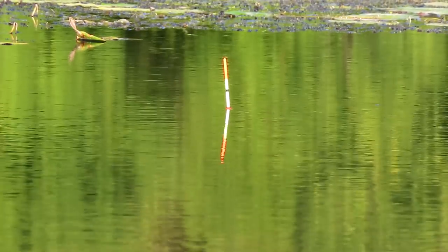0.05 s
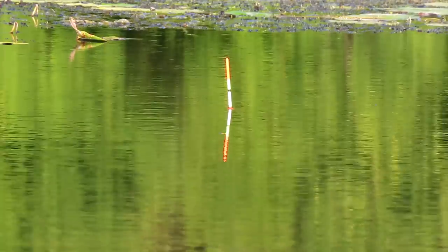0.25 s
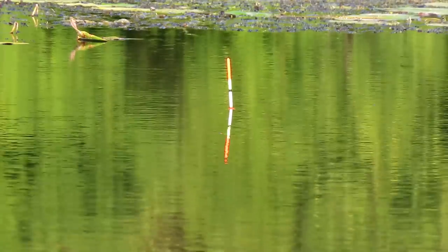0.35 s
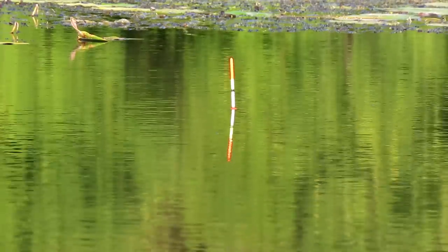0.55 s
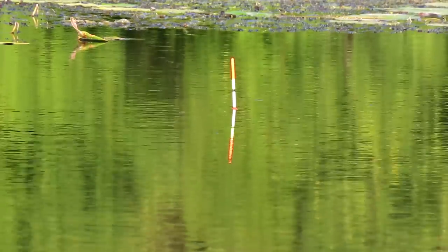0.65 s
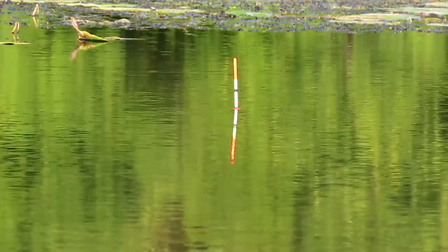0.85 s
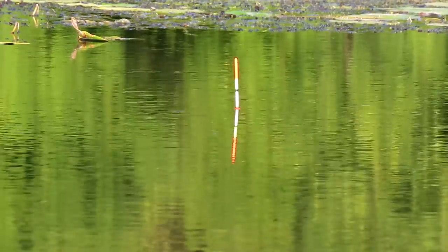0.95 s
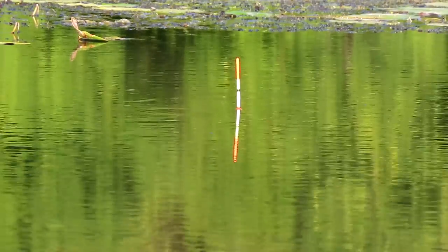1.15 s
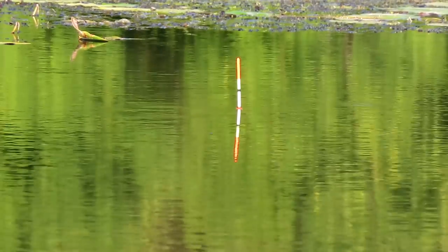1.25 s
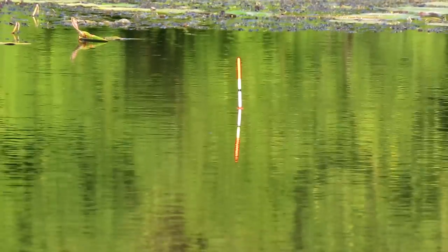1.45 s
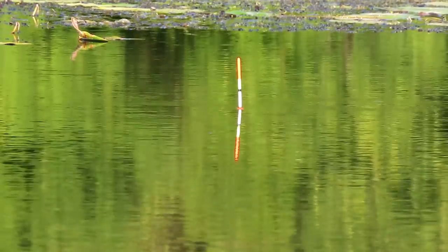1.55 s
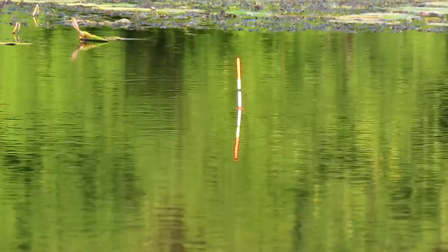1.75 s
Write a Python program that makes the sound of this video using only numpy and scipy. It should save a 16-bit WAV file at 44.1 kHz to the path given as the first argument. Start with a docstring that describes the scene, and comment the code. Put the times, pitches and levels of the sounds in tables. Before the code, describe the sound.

A frog calls beside a calm pond. From about 0.2 to 0.4 seconds it gives a wavering squeal that breaks into a rasp. From 0.7 to 1 second it croaks seven quick, rough-edged notes that grow louder. After a pause, four soft clucks come between 1.6 and 1.8 seconds. The calls have a slight, short echo, and a steady distant rumble with faint hiss continues throughout.

```python
"""Beside a calm pond, a frog gives one wavering squeal that breaks into a rasp, then a croak of seven
quick notes and a few soft clucks. Its vocal folds snap shut again and again, and each pulse makes its
throat ring; as a note's pulses slow down they turn uneven. The bank gives a short echo and the trees
a faint longer one, over a steady distant rumble."""
import sys
import numpy as np
from scipy import signal
from scipy.fft import rfft, irfft, next_fast_len
from scipy.io import wavfile

SR = 44100
rng = np.random.default_rng(int(sys.argv[2]) if len(sys.argv) > 2 else 0)


def unload_audio(sound):
    """Save the sound as a 16-bit wav file, at the path given as the first command line argument."""
    columns = np.transpose(np.atleast_2d(sound))
    # keep every value between -1 and 1, then stretch to whole-number steps
    steps = np.round(np.clip(columns, -1, 1) * 32767)
    wavfile.write(sys.argv[1], SR, steps.astype(np.int16))


N = 79380


def squeal():
    """A wavering tone whose dips in pitch grow deeper until it breaks into a rasp."""
    # Each row: time in seconds, pitch in Hz.
    pitch_curve = [(.17, 450), (.197, 485), (.205, 547), (.22, 523), (.232, 540), (.239, 531), (.247, 543),
                   (.258, 501), (.272, 526), (.284, 468), (.298, 562), (.308, 470), (.317, 385),
                   (.325, 505), (.332, 545), (.341, 475), (.351, 375), (.36, 490), (.367, 552), (.382, 435),
                   (.392, 340), (.43, 320)]
    # Each row: time in seconds, throat ring in Hz at the easy pitch, half width in Hz, roughness 0-1.
    throat_curve = [(.169, 1570, 605, 0.13), (.195, 1760, 680, 0.26), (.207, 2050, 524, 0.03),
                    (.25, 2040, 516, 0.05), (.275, 1990, 475, 0.1), (.288, 1960, 540, 0.01),
                    (.302, 1564, 382, 0.04), (.317, 1665, 420, 0.29), (.332, 1525, 357, 0.09),
                    (.351, 1730, 423, 0.34), (.368, 1555, 390, 0), (.39, 1820, 474, 0.42),
                    (.425, 2100, 564, 0.63)]
    # Each row: time in seconds, throat level in dB.
    level_curve = [(.17, -40), (.178, -38), (.2, -36.5), (.225, -29.5), (.234, -30), (.248, -20),
                   (.257, -28.5), (.268, -21.5), (.29, -21), (.306, -19), (.319, -24.5), (.326, -23.5),
                   (.34, -18), (.354, -25.5), (.367, -19.5), (.382, -23), (.39, -33.5), (.402, -23),
                   (.415, -28.5), (.43, -44)]
    # Each row: time in seconds, body level in dB, treble level in dB.
    colour_curve = [(.169, -62.5, -67), (.205, -55, -44), (.258, -43.5, -35), (.275, -30, -33.5),
                    (.29, -44, -33), (.302, -29, -43), (.33, -36.5, -29.5), (.348, -29.5, -36),
                    (.37, -29.5, -29.5), (.386, -38, -43), (.404, -32, -34), (.425, -49, -74)]
    easy_pitch_hz = 510
    t = np.arange(pitch_curve[0][0], pitch_curve[-1][0], 1 / SR)
    times = pulse_times(t, *at(pitch_curve, t))
    pitch_hz, = at(pitch_curve, times)
    throat_hz, width_hz, rough = at(throat_curve, times)
    throat_hz = throat_hz * np.sqrt(pitch_hz / easy_pitch_hz)  # the ring rises with the pitch
    throat_db, = at(level_curve, times)
    body_db, treble_db = at(colour_curve, times)
    return voice(times, pitch_hz, rough, throat_hz, width_hz, throat_db, body_db, treble_db)


def croak():
    """Seven quick pushes of air, one note each."""
    # Each row: start, peak and end in seconds, throat level in dB, pitch at the peak in Hz, throat ring
    # in Hz, body and treble levels in dB, rise and fall in dB, roughness 0-1.
    notes = [(0.704, 0.707, .725, -35, 240.4, 1350, -29.5, -55, 3.5, 2, 0.01),
             (0.741, 0.752, .772, -27, 408.4, 1310, -25.5, -48, 10.5, 8.5, 0.12),
             (.794, 0.801, .819, -21.5, 416, 1410, -27, -41.5, 9, 3, 0),
             (0.836, 0.846, .868, -17, 456.7, 1710, -30, -29.5, 13, 5, .04),
             (0.88, 0.891, .915, -13.5, 476.3, 1763, -29, -24, 13.5, 12, .03),
             (0.922, 0.936, .96, -14, 472.5, 1690, -23, -23.5, 21, 16.5, 0.09),
             (0.971, .981, 1.0, -15, 470, 1715, -27.5, -26.5, 10.5, 14.5, 0.05)]
    return sum(note(*row) for row in notes)


def note(start, peak, end, db, pitch_hz, throat_hz, body_db, treble_db, rise_db, fall_db, rough):
    """One push of air: it starts a little flat and rough, swells, then slows, weakens and turns uneven."""
    sag_hz_per_s, throat_width_hz, body_lag_s, close_s = 1830, 514, .005, .0054

    def early(t):  # 1 at the start, 0 from the peak on
        return np.clip((peak - t) / (peak - start), 0, 1)

    def late(t):  # 0 up to the peak, 1 at the end
        return np.clip((t - peak) / (end - peak), 0, 1)

    def pitch(t):
        sagging_hz = pitch_hz - sag_hz_per_s * (t - peak)
        return sagging_hz * (1 - .31 * late(t) ** 2 - .1 * early(t) ** 2)

    def swell_db(t):
        rising = rise_db * np.sin(np.pi / 2 * early(t)) ** 1.2
        falling = fall_db * np.sin(np.pi / 2 * late(t)) ** .89
        return -rising - falling

    t = np.arange(start, end, 1 / SR)
    times = pulse_times(t, pitch(t))
    rough = rough + .6 * late(times) ** 1.65 + .15 * early(times) ** 2
    fade_db = 2 * np.clip(1 - (end - times) / close_s, 0, 1)  # the last pulses fade as the folds close
    throat_db = db + swell_db(times) - fade_db
    body_db = body_db + .91 * swell_db(times - body_lag_s) - fade_db
    treble_db = treble_db + .79 * swell_db(times) - fade_db
    return voice(times, pitch(times), rough, throat_hz, throat_width_hz, throat_db, body_db, treble_db)


def voice(times, pitch_hz, rough, throat_hz, throat_width_hz, throat_db, body_db, treble_db):
    """Pulses ring the throat, body and treble tones; roughness makes the pulses uneven and noisy."""
    # Each row, in both tables: ringing tone in Hz, half width in Hz, relative level in dB.
    body_tones = [(523, 85, -12), (758, 134, -2), (2454, 255, -16.5)]
    treble_tones = [(2725, 170, -10), (3472, 440, -7), (4240, 294, -3), (4740, 270, -20.5),
                    (5360, 580, -30.5), (9200, 2500, -40.5)]
    jitter_cycles, shimmer_db, typical_pulses_per_s = .22, 3.5, 450
    rough = np.clip(rough, 0, 1)
    chance = rng.standard_normal((256, 2))[:len(times)]
    times = times + jitter_cycles * rough * chance[:, 0] / pitch_hz
    scatter_db = shimmer_db * rough * chance[:, 1]
    rasp = .02 + .22 * rough  # the share of rushing-air noise in a pulse
    tones = [(throat_hz, throat_width_hz, throat_db, rasp)]
    tones += [(hz, width, db + body_db, 4.5 * rasp) for hz, width, db in body_tones]
    tones += [(hz, width, db + treble_db, 3 * rasp) for hz, width, db in treble_tones]
    sound = np.zeros(N)
    for hz, width, db, tone_rasp in tones:
        size = amp(db + scatter_db) * np.sqrt(5 * width / typical_pulses_per_s)  # boosts short rings
        sound += ring(times, hz, width, size, tone_rasp)
    return sound


def pulse_times(t, pitch_hz):
    """One pulse each time the vocal folds finish a cycle."""
    cycles = np.cumsum(np.maximum(pitch_hz, 20)) / SR
    return np.interp(np.arange(int(cycles[-1]) + 1), cycles, t)


def ring(times, hz, width_hz, size, rasp):
    """Each pulse rings one tone, partly at random (rasp). A larger half width means a shorter ring."""
    times, hz, width_hz, size, rasp = (np.reshape(v, (-1, 1)) for v in (times, hz, width_hz, size, rasp))
    ring_s = .012
    index = np.ceil(times * SR).astype(int) + np.arange(int(ring_s * SR))
    age = index / SR - times
    progress = .75 * np.pi * width_hz * age
    envelope = (progress * np.exp(1 - progress)) ** 3  # loudest when progress is 1
    flutter = rng.standard_normal((256, 2))[:len(times)]
    phase = 2 * np.pi * hz * age
    noisy = flutter[:, :1] * np.sin(phase) + flutter[:, 1:] * np.cos(phase)
    rings = size * envelope * (np.sin(phase) + rasp * noisy)
    return np.bincount(index.ravel(), rings.ravel(), N)[:N]  # add each ring at its place in time


def clucks():
    """Single soft pulses with the throat slack: one just before the croak, four later on."""
    # Each row: start in seconds, level in dB.
    pulses = [(0.6824, -35), (1.582, -31.5), (1.6338, -29), (1.7421, -26), (1.7913, -26)]
    # Each row: ringing tone in Hz, half width in Hz, relative level in dB.
    tones = [(600, 200, 2.5), (1444, 294, -4), (2000, 640, -6.5)]
    times, db = np.transpose(pulses)
    return sum(ring(times, hz, width, amp(db + level), rasp=.12) for hz, width, level in tones)


def echo(sound, fade_s):
    """Sound bounces back as a blurred tail that starts after a short trip and drops 60 dB in fade_s."""
    delay_s = .008
    t = np.arange(SR // 2) / SR
    tail = rng.standard_normal(len(t)) * amp(-60 * t / fade_s) * (t > delay_s)
    return signal.fftconvolve(sound, tail / np.linalg.norm(tail))[:N]


def air():
    """Steady distant rumble and faint hiss."""
    # Each row: frequency in Hz, relative noise level in dB.
    spectrum = [(13, -19), (22, 0), (49, -10), (70, -13), (138, -14.5), (187, -10.5), (253, -10.5),
                (275, -5), (306, -6), (371, -1), (489, -9), (560, -14), (643, -13), (846, -10.5),
                (1240, -24.5), (1350, -23.5), (2090, -28.5), (3160, -32), (4760, -39.5), (5320, -39.5),
                (15500, -49)]
    hz, db = np.transpose(spectrum)
    noise = rng.standard_normal(N)
    return unit(filtered(noise, lambda f: amp(np.interp(np.log(f + 1), np.log(hz + 1), db))))


def amp(db):
    """Turn decibels into a multiplier."""
    return 10 ** (np.asarray(db) / 20)


def unit(sound):
    """Scale a sound to an average power of 1."""
    return sound / np.sqrt(np.mean(sound ** 2) + 1e-20)


def at(rows, times):
    """Read each column of a table at the given times, gliding between rows."""
    row_times, *columns = np.transpose(rows)
    return [np.interp(times, row_times, column) for column in columns]


def filtered(sound, gain):
    """Turn each frequency up or down by gain(hz)."""
    size = next_fast_len(N + SR // 2)
    return irfft(rfft(sound, size) * gain(np.fft.rfftfreq(size, 1 / SR)), size)[:N]


def scene():
    """The frog, its echoes and the open air."""
    frog = squeal() + croak() + clucks()
    bank = amp(-19) * echo(frog, fade_s=.08)
    trees = amp(-43) * echo(frog, fade_s=.7)
    return (frog + bank + trees + amp(-39) * air())[None]


def record(dry):
    """Cut away the very highest treble."""
    return filtered(dry[0], lambda hz: hz < 15800)[None]


dry = scene()
out = record(dry)
unload_audio(out)
```